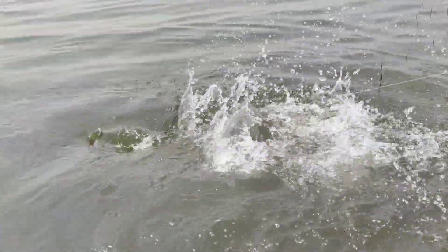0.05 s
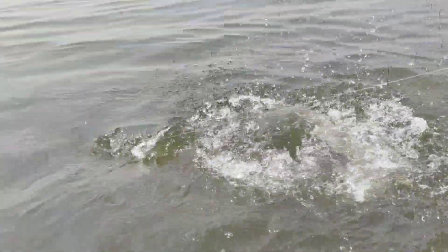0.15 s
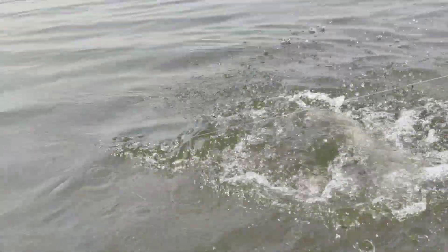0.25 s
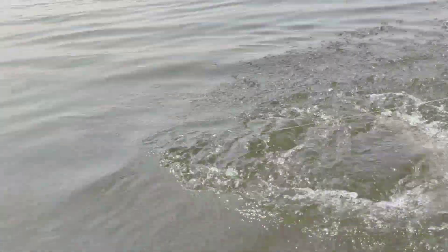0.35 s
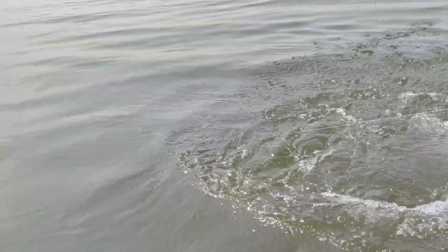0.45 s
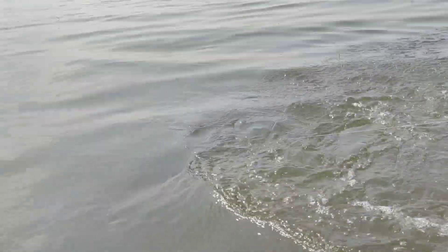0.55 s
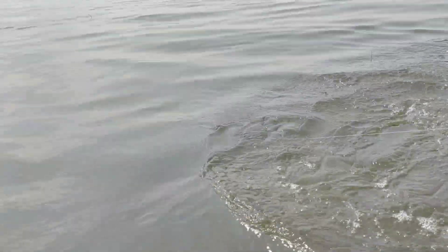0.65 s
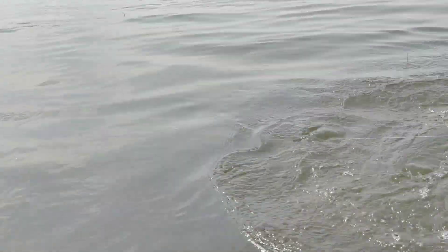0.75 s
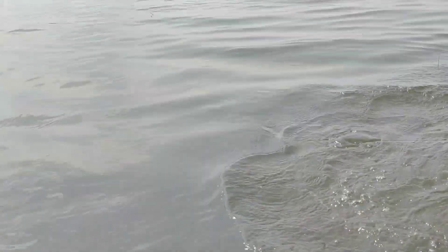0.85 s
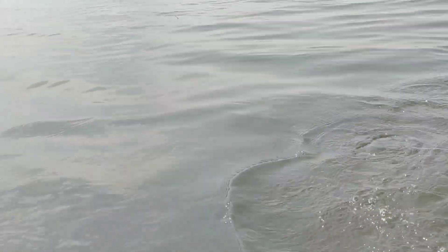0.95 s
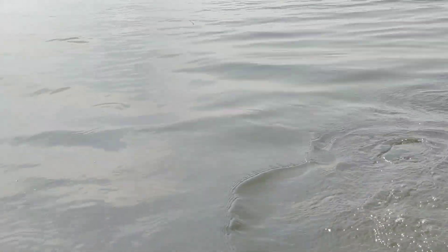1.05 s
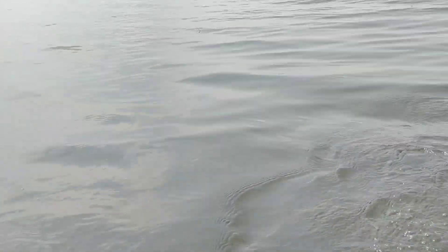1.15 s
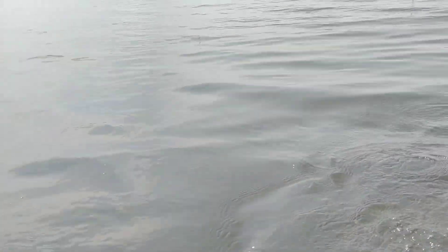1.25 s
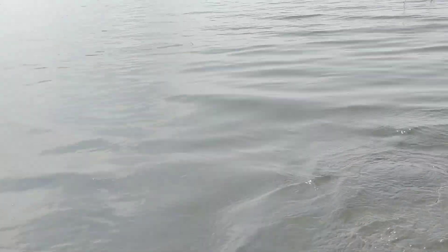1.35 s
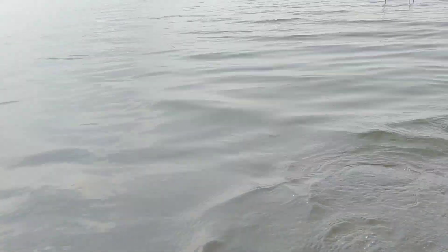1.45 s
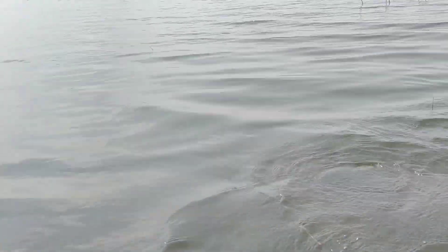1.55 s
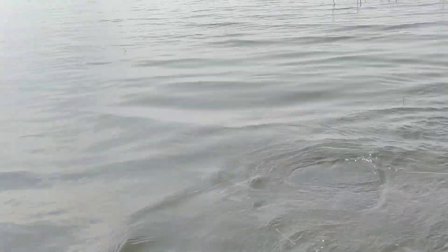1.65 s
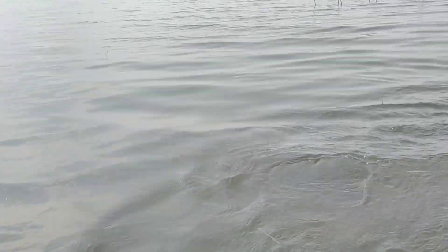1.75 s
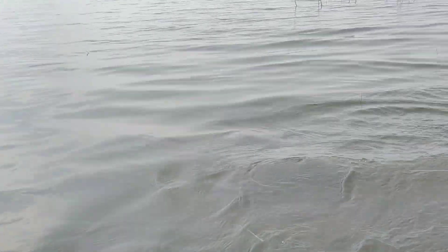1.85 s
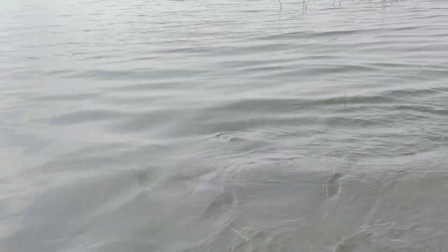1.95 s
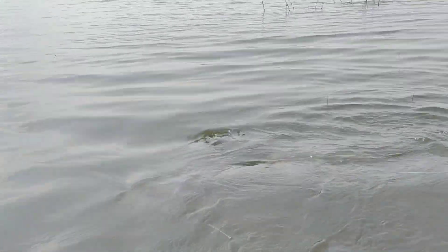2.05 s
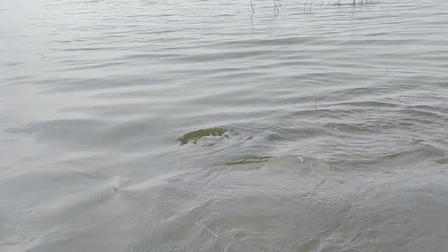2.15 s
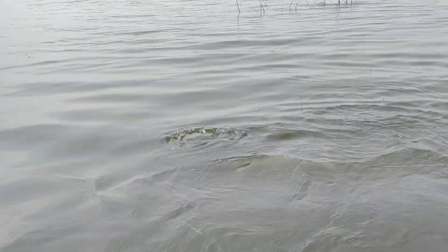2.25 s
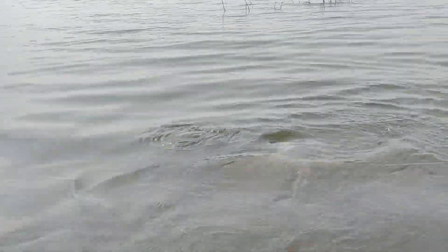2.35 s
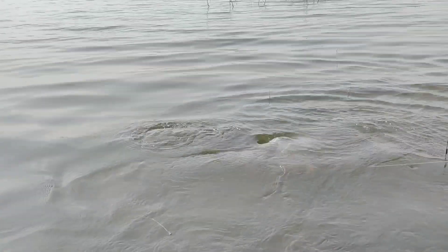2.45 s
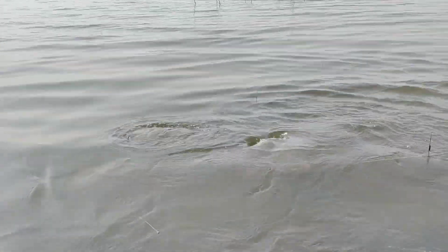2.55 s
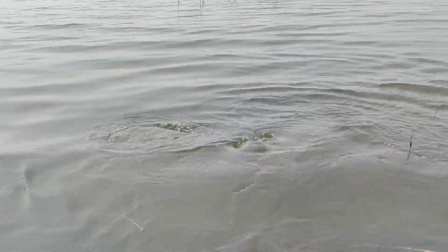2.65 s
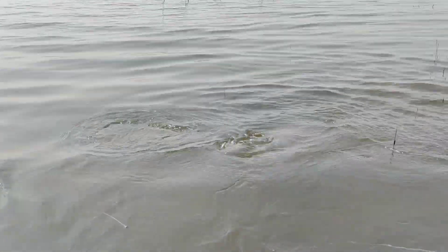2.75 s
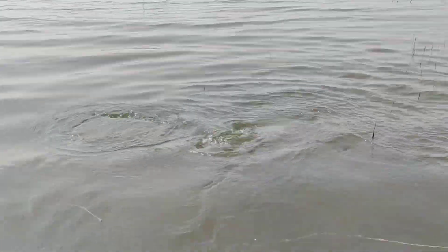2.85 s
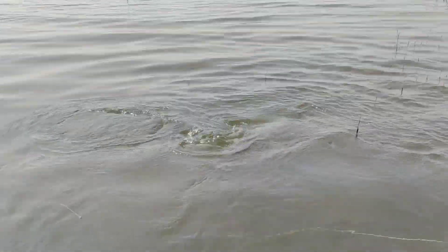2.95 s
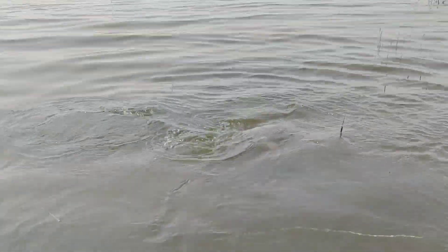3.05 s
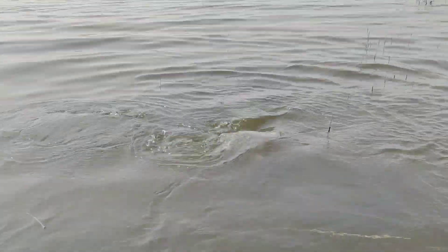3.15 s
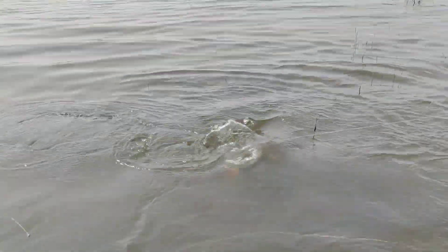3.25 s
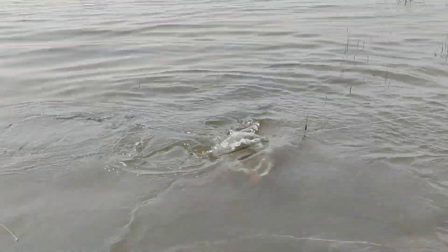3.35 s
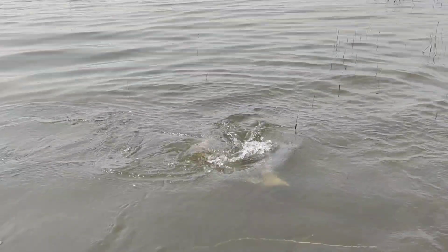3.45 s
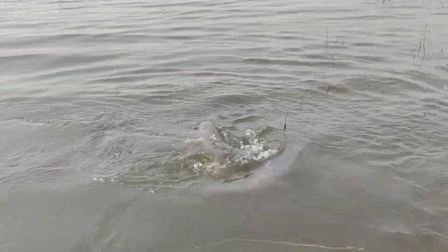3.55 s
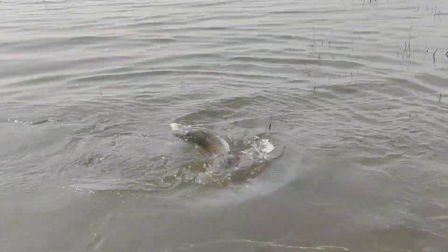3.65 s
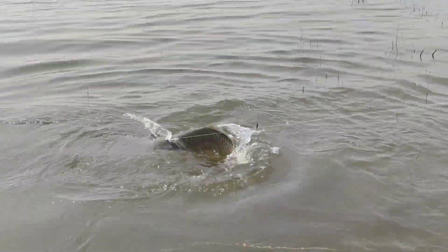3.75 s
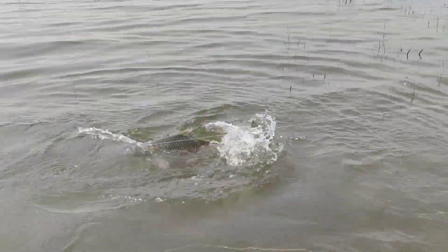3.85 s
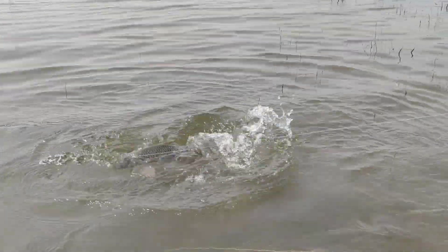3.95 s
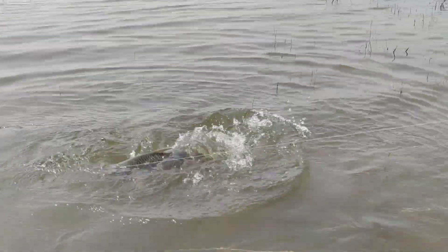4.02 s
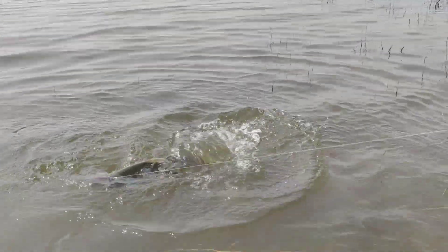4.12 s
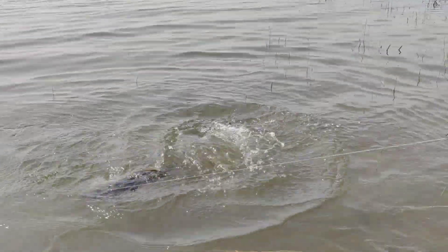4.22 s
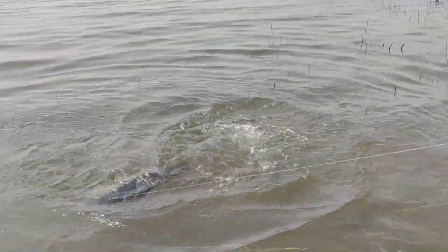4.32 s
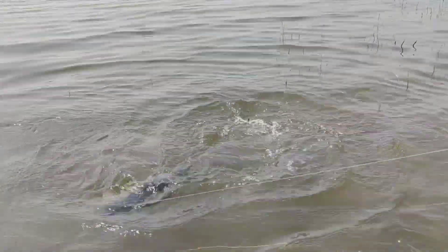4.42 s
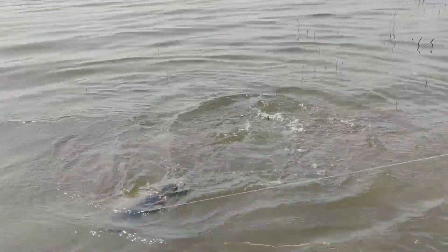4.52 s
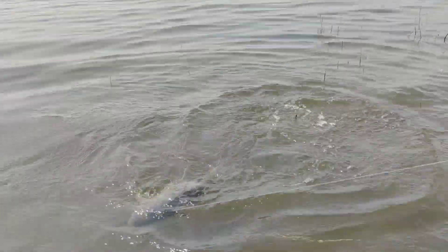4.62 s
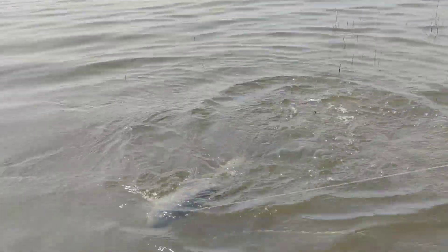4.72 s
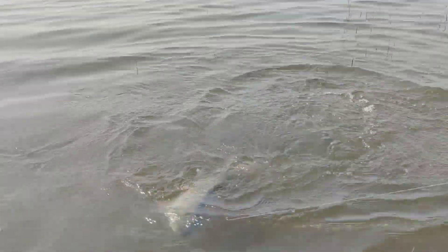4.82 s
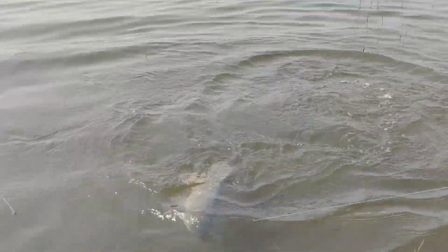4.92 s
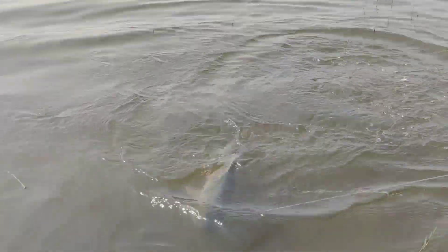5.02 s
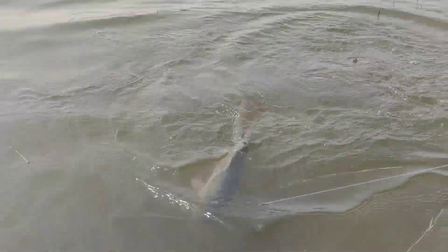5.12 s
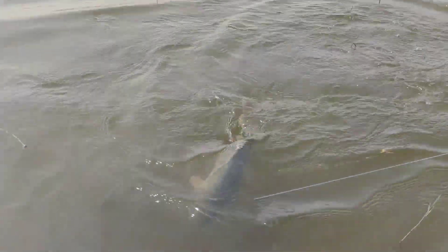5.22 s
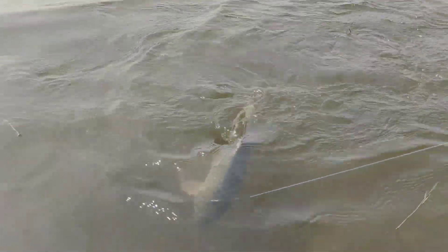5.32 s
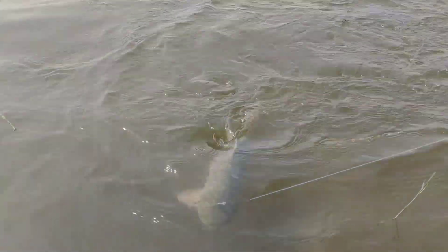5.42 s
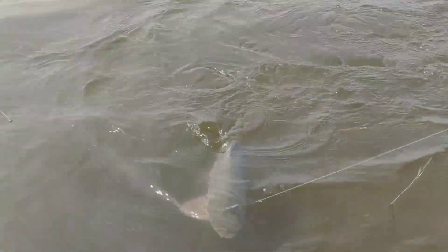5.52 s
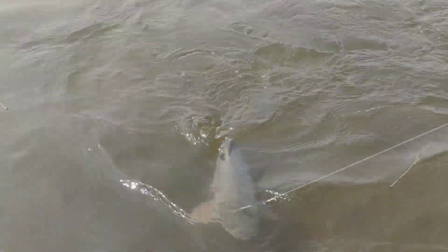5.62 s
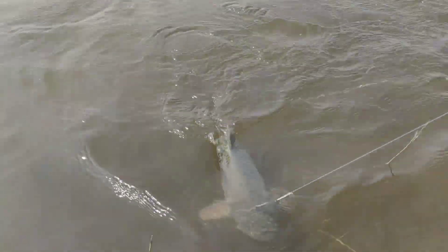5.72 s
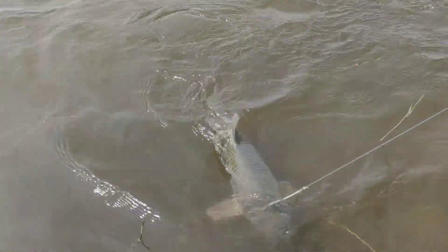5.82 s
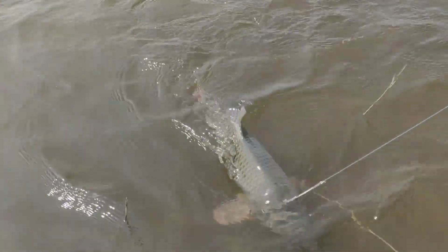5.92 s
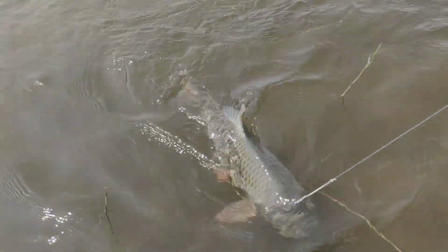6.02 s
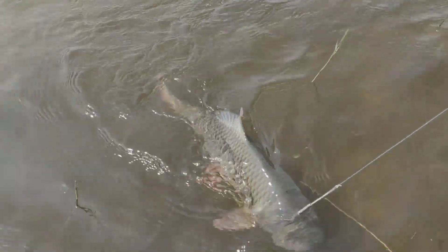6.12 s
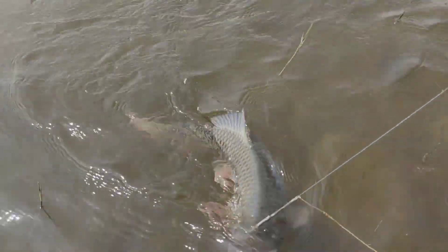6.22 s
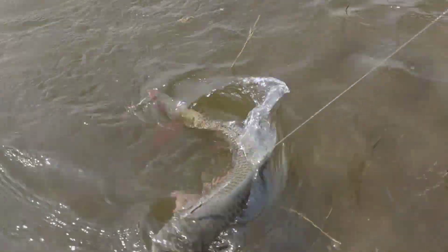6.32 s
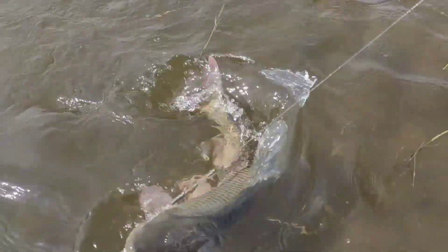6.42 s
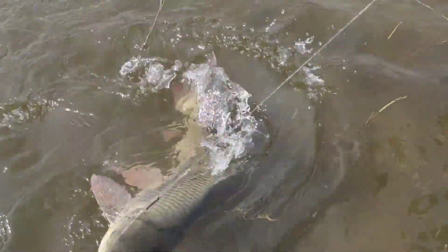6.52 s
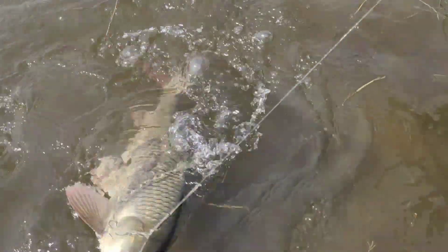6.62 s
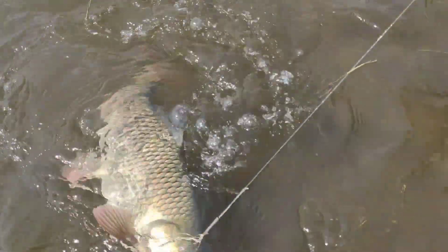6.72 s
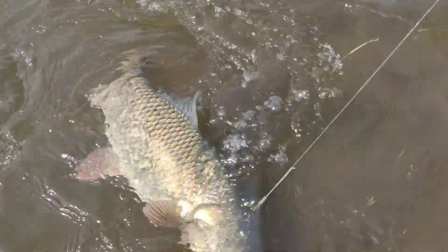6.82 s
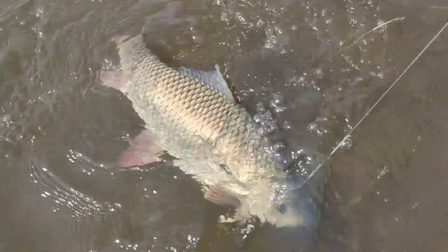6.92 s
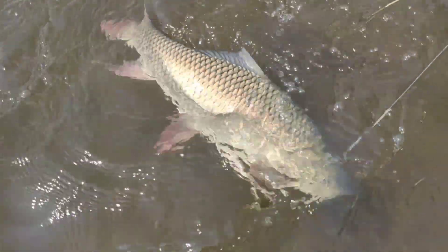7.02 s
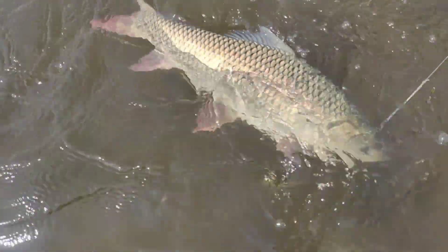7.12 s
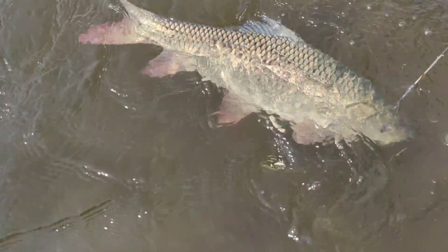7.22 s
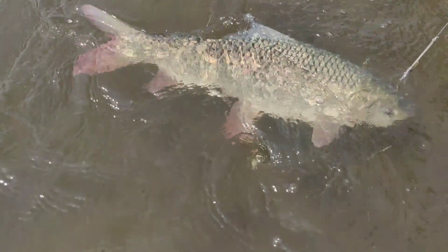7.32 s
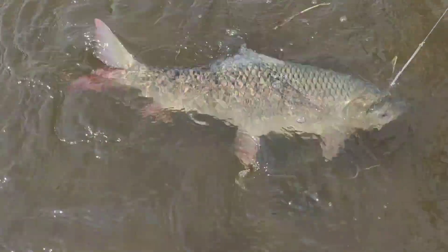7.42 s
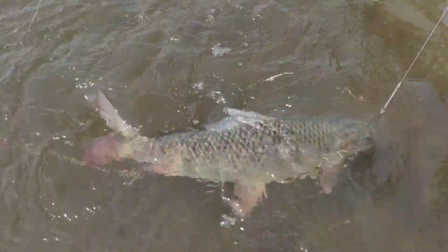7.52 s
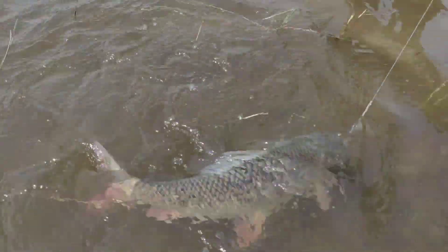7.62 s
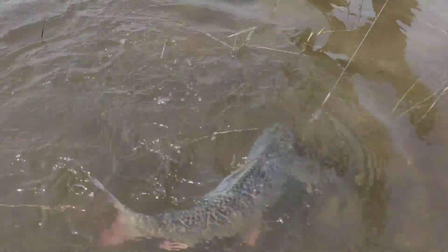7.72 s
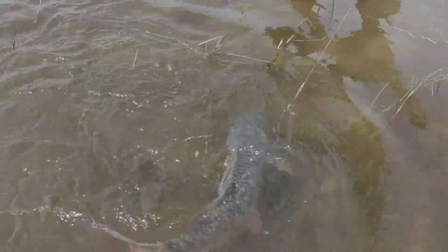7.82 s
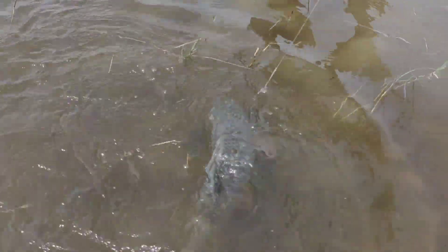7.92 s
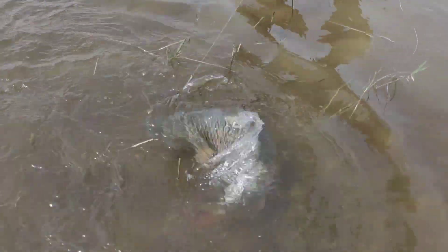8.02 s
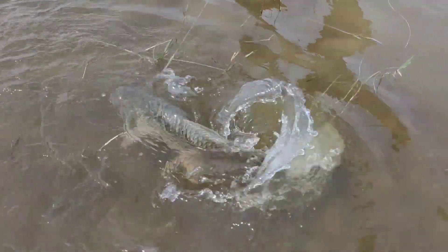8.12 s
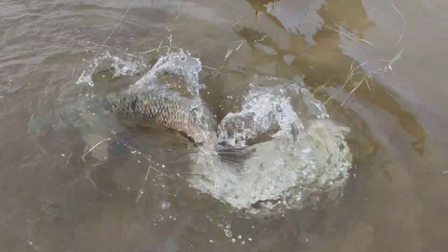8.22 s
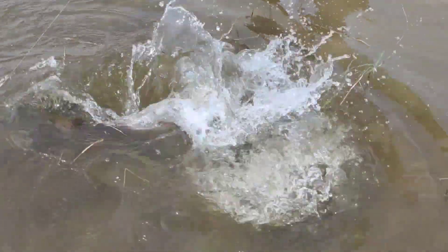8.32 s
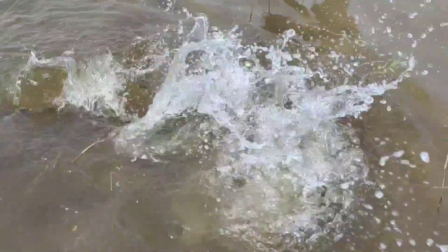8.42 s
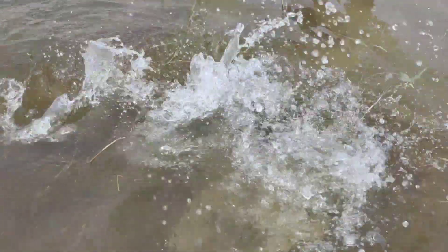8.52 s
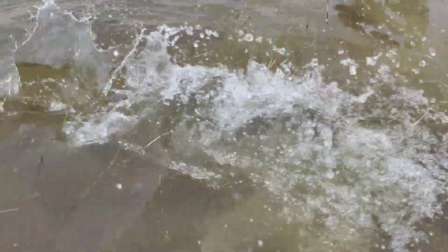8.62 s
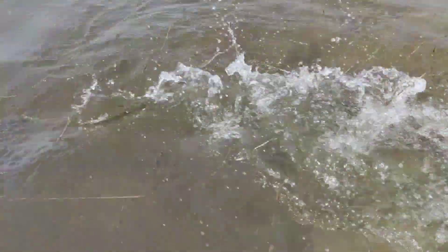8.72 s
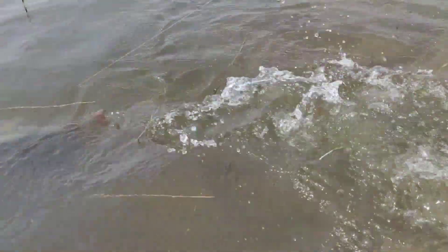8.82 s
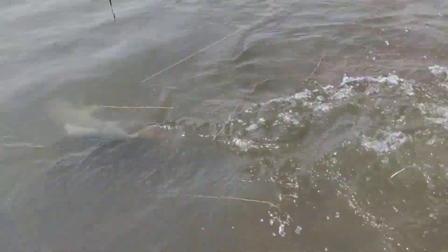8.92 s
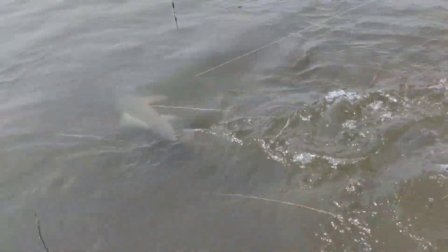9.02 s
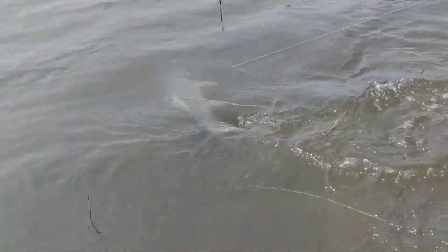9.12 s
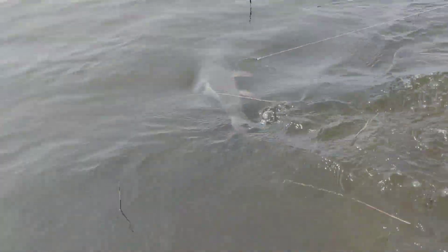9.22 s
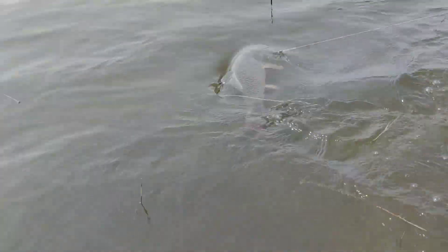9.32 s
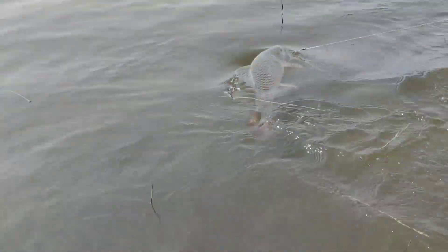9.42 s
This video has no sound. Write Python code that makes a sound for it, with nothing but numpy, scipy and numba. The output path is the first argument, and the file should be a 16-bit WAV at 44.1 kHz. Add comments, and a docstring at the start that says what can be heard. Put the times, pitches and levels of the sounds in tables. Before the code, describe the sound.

Close stereo sound of a fish fighting in shallow river water. A splash already under way settles into fizz and near quiet, with soft bumps and far bird chirps. Slaps and gulps return around three to four seconds, then sparse drips. A sharp slap follows at mid-length, another lull, then the loudest churning thrash, falling spray and last gulps. Open air, faint hiss, almost no echo.

```python
"""A hooked fish thrashes in the shallows of a river, close to two microphones.
Its body slaps the surface with short rings and cracks, trapped air gulps in sliding tones,
clouds of dying sines make the bubbles churn, and shaped noise and clicks make spray, landing drops and froth.
Around these come ringing drips, soft low bumps, noise for a light breeze and distant hiss, and a small far bird."""
import sys
import numpy as np
from scipy import signal
from scipy.fft import rfft, irfft
from scipy.io import wavfile
from scipy.ndimage import uniform_filter1d
from numba import njit

SR = 44100
rng = np.random.default_rng(int(sys.argv[2]) if len(sys.argv) > 2 else 0)


def master_out(mix):
    """Clip the mix to full scale and print it as 16-bit PCM to the path in sys.argv[1]."""
    frames = np.transpose(np.atleast_2d(mix))
    ceiling = np.clip(frames, -1, 1)
    pcm = np.round(ceiling * 32767).astype(np.int16)
    wavfile.write(sys.argv[1], SR, pcm)


N = 417186
TIME = np.arange(N) / SR

# bubble clouds, large to small, before crowding thins and evens them: (lowest pitch [Hz], highest pitch [Hz],
# bubbles tried [per s], typical cycles to ring down by 1/e [count], spread of sizes [dB])
CLOUDS = [(176.4, 610, 420, 3.4, 5.5), (495.2, 1600, 1200, 4.27, 4), (1375, 5200, 3200, 5.4, 4.5)]
# where the fish is: (time [s], lag of the left microphone [ms], scatter of the lag [ms])
PLACE = [(0, 0.054, 0.11), (2.5, 0.052, 0.01), (4.1, 0.092, 0.047), (5.3, -0.28, 0.041),
         (6.38, -0.25, 0.17), (6.47, 0.098, 0.092), (8.4, 0.13, 0.082), (8.85, 0.19, 0.12),
         (9.1, -0.4, 0.11)]
# strokes of the fish, each stirs the water, then lets it settle: (start [s], strength [dB], length [s],
# basic settling [dB per s], deep churn against the strength [dB], spray against the strength [dB])
STROKES = [(-.3, -39, 0.37, 48, -5.5, -10), (0.09, -47, 0.12, 58.5, -4, -0.5),
           (2.47, -61.5, 0.24, 49.5, -5.5, -14.5), (3.297, -55, 0.33, 50, -6.5, -14.5),
           (3.506, -51, 0.14, 66.5, -13.5, -11), (3.84, -48, 0.29, 82, -11, -8.5),
           (3.95, -47.5, 0.051, 71, -1, -3), (5.755, -69.5, 0.33, 33, -7, -2.5),
           (6.232, -67, 0.079, 50, -8, -2), (6.378, -66.5, 0.2, 48, -1, 8.5),
           (6.494, -47, 0.07, 61, -19, -1), (7.03, -69, 0.061, 16.5, -16, 0),
           (7.887, -59, 0.079, 40, -26, -4), (8.066, -49.5, 0.25, 60, -16, -9),
           (8.156, -36.5, 0.15, 66, -7.5, -5), (8.316, -29.5, 0.17, 79, -3, -10),
           (8.601, -45.5, 0.2, 69, -2, -2), (8.878, -51, 0.052, 50, -30, -5.5),
           (9.091, -47.5, 0.17, 90, -15.5, -19)]
# slaps of body and falling water: (time [s], level [dB], ring pitch [Hz], crack against the ring [dB])
SLAPS = [(.393, -34, 2100, -1), (.408, -34.5, 980, -0.5), (.45, -41, 734, 0), (.492, -40, 1114, -1),
         (2.376, -51, 900, -4), (3.238, -22.5, 1850, -20), (3.244, -39.5, 1190, -3), (3.314, -36, 706, -1),
         (3.428, -40, 600, -6), (3.678, -36.5, 1240, -8), (3.84, -33.5, 2050, -13), (3.867, -30, 1190, 1),
         (3.903, -23, 1110, -3), (3.925, -27, 370, -2), (3.96, -27.5, 314, 10), (4.009, -25.5, 1310, -1),
         (4.096, -30.5, 1100, -4), (6.571, -14, 860, -10), (6.587, -28, 970, -6), (8.102, -27.5, 1140, -16),
         (8.17, -17, 643, -25), (8.195, -17.5, 443, -18), (8.226, -18, 600, -2), (8.235, -20, 520, -10),
         (8.255, -19, 298, -5), (8.318, -16, 1800, -2), (8.378, -18.5, 304, 2), (8.39, -17.5, 298, 2),
         (8.408, -17.5, 390, -22), (8.446, -11, 893, -8), (8.463, -10.5, 390, -2), (8.548, -18, 750, -4),
         (8.692, -23, 780, -14), (8.711, -23.5, 870, 0)]
# pockets of air that gulp as they close: (time [s], level [dB], first pitch before wobble [Hz],
# last pitch before wobble [Hz], length [s], place of the crest before the closing fade [0-1])
GULPS = [(0.025, -33, 356, 276, 0.066, 0.15), (0.32, -42, 590, 1155, 0.044, .2),
         (2.495, -47, 593, 1010, 0.038, 0.28), (2.505, -51.5, 1677, 1060, 0.021, 0.5),
         (2.538, -48, 410, 545, 0.031, 0.16), (2.637, -51, 760, 970, 0.022, 0.7),
         (2.726, -50, 466, 490, 0.022, 0.33), (3.325, -38, 474, 585, 0.023, 0.35),
         (3.349, -42, 333, 375, 0.086, 0.08), (3.425, -41.5, 560, 620, 0.024, 0.19),
         (3.915, -31, 380, 312, 0.043, 0.24), (3.956, -24, 242, 170, 0.055, 0.08),
         (3.995, -17.5, 308, 430, 0.015, 0.2), (4.037, -44, 414, 374, 0.27, 0.07),
         (4.177, -50, 730, 920, 0.025, 0.1), (6.517, -27, 414, 513, 0.01, 0.12),
         (6.527, -23, 699, 1250, 0.027, 0.19), (6.588, -46, 478, 440, 0.15, .1),
         (6.73, -47.5, 448, 480, 0.047, 0.13), (6.84, -45.5, 680, 770, 0.038, .25),
         (6.883, -50.5, 782, 1080, 0.085, 0.1), (8.166, -22, 430, 217, 0.028, 1),
         (8.195, -17, 144, 95, 0.072, .08), (8.224, -15, 198, 158, 0.06, 0.11),
         (8.277, -31.5, 668, 1545, 0.033, .9), (8.368, -19.5, 263, 336, 0.045, 0.5),
         (8.43, -24, 644, 890, 0.021, 0.9), (8.459, -27, 195.5, 184, 0.16, 0.07),
         (8.676, -31, 561, 1010, 0.037, 0.6), (8.751, -23, 208, 263, 0.016, 0.08),
         (9.053, -43, 477, 980, 0.04, 0.8), (9.119, -37.5, 450, 340, 0.021, 0.11),
         (9.189, -31.5, 474, 787, 0.029, 0.21), (9.226, -43, 614, 1354, 0.022, 1),
         (9.264, -35.5, 557, 1620, 0.041, .9)]
# drips that ring one bubble each: (time [s], relative level [dB], settled pitch [Hz])
DRIPS = [(0.626, -48, 1090), (0.747, -48, 2330), (2.715, -48.5, 1240), (3.287, -43.5, 1190),
         (3.586, -40, 518), (3.64, -41, 1073), (3.911, -27.5, 1910), (4.29, -45.5, 1000),
         (4.698, -51, 1870), (5.413, -44, 896), (5.545, -47, 1530), (5.548, -53, 3570), (5.624, -51, 2900),
         (5.689, -42.5, 2500), (5.902, -50.5, 586), (5.968, -50.5, 2420), (6.247, -51.5, 853),
         (6.292, -41.5, 2530), (6.302, -45.5, 3100), (6.334, -39, 2570), (6.389, -35.5, 1350),
         (6.668, -27, 780), (6.776, -40, 1825), (6.826, -43.5, 895), (6.926, -29, 3070), (7.008, -33, 2930),
         (7.02, -37.5, 1860), (7.102, -44, 776), (7.865, -46, 1270), (7.907, -40.5, 1335),
         (7.97, -40.5, 1200), (8.969, -37, 1206), (9.259, -35, 1854), (9.367, -47, 1670)]
# thrown water landing, from dull blobs to the snap of fine drops: (time [s], relative level [dB], centre [Hz])
LANDINGS = [(0.049, -39, 4600), (0.153, -31, 4600), (0.269, -33, 2400), (2.376, -45, 2950),
            (2.575, -43, 2800), (2.568, -40, 8200), (3.457, -37, 8240), (3.542, -34.5, 2400),
            (3.607, -45, 2400), (3.479, -42.5, 8300), (3.607, -45, 8300), (3.679, -41.5, 8240),
            (3.693, -41, 8300), (3.907, -34, 4500), (4.012, -28.5, 4770), (4.06, -45, 5500),
            (5.519, -51.5, 8300), (5.901, -49.5, 8200), (6.039, -52, 8300), (6.393, -42, 8300),
            (6.4278, -39, 8300), (6.525, -30, 2570), (6.556, -32, 8300), (6.665, -41, 8300),
            (6.756, -41, 8300), (6.926, -36, 8300), (7.099, -43, 2400), (7.954, -50, 8300),
            (8.3724, -22, 8300), (8.446, -40, 2410), (8.58, -27, 8360), (8.831, -27.5, 8360),
            (8.832, -27, 2380), (8.852, -29, 2380), (8.888, -39, 8300), (9.146, -33.5, 2300),
            (9.257, -41, 2280)]
# soft low bumps, mostly on the left: (time [s], level averaged over both sides [dB], pitch [Hz])
BUMPS = [(2.325, -39.5, 109), (2.386, -37.5, 150), (2.475, -37.5, 154), (2.957, -41.5, 170),
         (4.674, -51.5, 155), (5.335, -47.5, 153), (5.685, -51, 147), (7.558, -45.5, 100),
         (7.825, -43.5, 95)]
# the bird's chirps: (time [s], relative level [dB], base pitch [Hz])
CHIRPS = [(1.854, -78, 4800), (2.342, -65, 4660), (2.845, -65, 4760), (3.055, -66, 4900), (3.24, -63, 4670),
          (4.3, -65, 4750), (4.53, -66, 4800), (4.8, -62, 4440)]
# a chirp's path: (time from its start [s], factor on the base pitch [ratio])
CHIRP_SHAPE = [(0, .94), (.03, .97), (.05, 1.01), (.06, .94), (.074, .76)]
# gusts at the microphones: (crest [s], level averaged over both sides [dB], half width to 1/e [s],
# left over right [dB])
GUSTS = [(.68, -68, 0.14, -19), (1.37, -55, 0.061, -18.5), (3.03, -65.5, 0.24, 0), (8.45, -53, 0.27, 3)]
# tone of the breeze: (frequency [Hz], level [dB])
BREEZE_COLOUR = [(20, -16.5), (45, -5.5), (80, 4.5), (160, 3), (260, -26.5), (600, -23), (2000, -52.5)]
# tone of the froth: (frequency [Hz], level [dB])
FOAM_COLOUR = [(500, -21.5), (1800, -25), (3200, 0.5), (5500, -2.5), (9000, -8), (15000, 6)]
# tone of the spray: (frequency [Hz], level [dB])
SPRAY_COLOUR = [(300, -12), (1500, 6), (4200, 1.5), (6000, -4.5), (8500, -5), (11000, -3), (13500, -2.5),
                (16000, 0)]
# tone of the distant hiss: (frequency [Hz], level [dB])
AIR_COLOUR = [(59, -17.5), (100, -7), (189, -3), (580, -12.5), (717, -14), (797, -14.5), (1540, -17.5),
              (3590, -20), (4250, -22), (5480, -21), (7060, -25), (8920, -22.5), (14800, -27.5),
              (15800, -31)]
# how alike the hiss is on both sides: (frequency [Hz], left-right coherence [0-1])
AIR_LIKENESS = [(50, 0.5), (200, 0.66), (500, 0.29), (1000, 0.11), (4000, 0.034)]
# how the left microphone colours the water: (frequency [Hz], gain [dB])
LEFT_PORT = [(100, -14.5), (400, 2.5), (680, 0), (1100, 5.5), (2600, 7), (4500, 1), (7200, -5), (8900, 5),
             (11000, 3), (15000, -9)]
# how the right microphone colours the water: (frequency [Hz], gain [dB])
RIGHT_PORT = [(100, -6.5), (400, 0), (580, -1), (950, 4), (2600, 2.7), (4500, 1.5), (6500, 4), (7600, 7),
              (8600, 13.5), (9800, 6.5), (12000, -5), (15000, -8)]

STROKE_RISE_S = 0.024  # time a stroke takes to build up
DEEP_LAG_S = 0.015  # large bubbles form only once the hollow behind the stroke closes
EVENING = 0.25  # share by which a crowd of bubbles or drops evens out their sizes
FOAM_FULL_DB = -32.5  # strength beyond this adds no more froth
# froth left by one second of stirring against its strength, time to form, fading
FOAM_DB, FOAM_RISE_S, FOAM_FADE_DB_PER_S = 1, 0.13, 10
BREEZE_DB = -69.5  # steady breeze beneath the gusts, before its lumps


def gain_of(db):
    """Turns decibels into a gain."""
    return 10 ** (np.asarray(db) / 20)


def evened(x):
    """Scales to an average strength (rms) of 1."""
    return x / np.sqrt(np.mean(x ** 2) + 1e-20)


def steadied(x, size):
    """Holds the rms near 1 over size samples and keeps the finer grain."""
    power = (x ** 2).mean(0)
    power = uniform_filter1d(uniform_filter1d(power, size), size)
    return x / np.sqrt(abs(power) + power.mean() / 100)


def slow_noise(size):
    """Random ups and downs, smoothed twice over size samples, with an rms of 1."""
    noise = rng.standard_normal(N)
    return evened(uniform_filter1d(uniform_filter1d(noise, size), size))


def read(points, hz):
    """Reads a frequency table on a log-frequency axis."""
    f, value = np.transpose(points)
    return np.interp(np.log(hz + 1), np.log(f + 1), value)


def along(rows, s, axis=1):
    """Reads one column of a table at times s."""
    rows = np.array(rows)
    return np.interp(s, rows[:, 0], rows[:, axis])


def coloured(x, points):
    """Filters with the given spectrum, without sounding ahead of the input."""
    log_gain = np.log(gain_of(read(points, abs(np.fft.fftfreq(4096, 1 / SR)))))
    # minimum phase puts the filter's energy as early as it can be
    taps = np.fft.ifft(np.exp(np.conj(signal.hilbert(log_gain)))).real[:2048]
    return signal.oaconvolve(x, taps[None], axes=1)[:, :N]


def add(mix, s, sound):
    """Places a sound at the fish, reaching the two microphones a little apart."""
    lag_s = along(PLACE, s) / 1000
    for port, at in zip(mix, (s + lag_s / 2, s - lag_s / 2)):
        part = port[max(round(at * SR), 0):][:len(sound)]
        part += sound[:len(part)]


def sides(left_db):
    """Gains of the two microphones for a sound that is stronger at one of them."""
    return 2 / (1 + gain_of([[-left_db], [left_db]]))


def burst(low_hz, high_hz, rise_s, fade_s, grain_db=0):
    """A puff of breaking water with a peak of 1: filtered noise; the grainier, the more it crackles."""
    t = np.arange(4000) / SR
    noise, grain = rng.standard_normal((2, len(t)))
    swell = (1 - np.exp(-t / rise_s)) ** 2 * np.exp(-t / fade_s) * gain_of(grain_db * grain)
    band = signal.butter(2, [low_hz, min(high_hz, SR / 2.5)], "band", fs=SR)
    puff = signal.lfilter(*band, noise * swell)
    return puff / abs(puff).max()


def stirred(depth=0, spray=0, settling=1, lag_s=0):
    """Strength of one water layer: strokes build up, hold and settle, weighted by their depth and spray."""
    power = np.zeros(N)
    for s, db, length, db_per_s, depth_db, spray_db in STROKES:
        first = max(int(s * SR), 0)
        t = TIME[first:first + 2 * SR] - s
        settled_db = settling * db_per_s * np.maximum(t - length, 0)
        level_db = db + depth * depth_db + spray * spray_db - settled_db
        build_up = np.clip((t - lag_s) / STROKE_RISE_S, 0, 1)
        power[first:first + len(t)] += (build_up * gain_of(level_db)) ** 2
    return np.sqrt(power) + 1e-9


def crowding(stir, growth=0.62, full_db=-5):
    """Share of the most drops or bubbles the water can hold: full just under the hardest thrash."""
    return np.minimum(stir / (gain_of(full_db) * stir.max()), 1) ** growth


def clumps(depth_db, size):
    """Water falls in uneven sheets: a gain that surges within hundredths of a second."""
    surge = np.tanh(slow_noise(size) / 2) * 2  # holds back the extremes
    return evened(gain_of(depth_db * surge))


@njit
def ring_all(starts, hz, size, life, glide, out_length, sr):
    """Sums dying sines whose pitch glides, one for each bubble and microphone."""
    out = np.zeros((2, out_length))
    for port in range(2):
        for k in range(len(hz)):
            first = int(starts[port, k] * sr) + 1
            for i in range(max(first, 0), min(first + int(6 * life[k] * sr), out_length)):
                t = i / sr - starts[port, k]
                u = t / life[k]
                swell = np.exp(-u) - np.exp(-3 * hz[k] * t)
                out[port, i] += size[k] * swell * np.sin(2 * np.pi * hz[k] * t * (1 + glide[k] * u))
    return out


def cloud(low_hz, high_hz, per_s, cycles, spread_db, stir, rise=0.015, calm=0.03):
    """Bubbles ring all round the fish, crowding into an even roar when it thrashes; many rise in pitch."""
    crowd = crowding(stir)
    draws = rng.random((int(per_s * N / SR), 8))
    born = draws[:, 7] < calm + crowd[(draws[:, 0] * N).astype(int)]
    when, pitch, big, damp, a, b, c, _ = draws[born].T
    s = when * N / SR
    hz = low_hz * (high_hz / low_hz) ** pitch
    scatter = np.sqrt(6) * (a - b)  # standard deviation 1
    lag_s = (along(PLACE, s) + along(PLACE, s, axis=2) * scatter) / 1000
    evening = EVENING * np.minimum(2 * np.interp(s, TIME, crowd), 1)
    size_db = spread_db * (1 - evening) * np.minimum(-np.log(big), 4.5)
    life = np.maximum(cycles * 7.7 ** (2 * damp - 1), 0.6) / hz
    # bubbles near the ends of the range are softer, and long rings start softer
    size = gain_of(size_db) * np.sin(np.pi * pitch) ** 0.6 / (life * hz) ** 0.4
    starts = np.array([s + lag_s / 2, s - lag_s / 2])
    rings = ring_all(starts, hz, size, life, rise * (2.4 * c - 0.7), N, SR)
    return stir * steadied(rings, size=1900)


def churn(deep_db=3.5, middle_db=-1.06, small_db=0.5):
    """Three clouds: large bubbles come with deep strokes and settle first, small ones go with the spray."""
    deep = stirred(depth=1, settling=1.12, lag_s=DEEP_LAG_S)
    stirs = deep, stirred(), stirred(spray=0.5)
    levels_db = deep_db, middle_db, small_db
    return sum(gain_of(db) * cloud(*bubbles, stir) for db, bubbles, stir in zip(levels_db, CLOUDS, stirs))


def spray(per_s=4200, spray_db=3, drop_spread_db=6.0, mist=0.2):
    """Droplets hit the surface in clumps of tiny clicks, sparse in a small splash, over a fine mist."""
    stir = stirred(spray=0.78)
    crowd = crowding(stir)
    falls = rng.random(N) < per_s / SR * crowd
    size_db = drop_spread_db * (0.5 - 2 * EVENING * crowd) * np.minimum(rng.exponential(1, N), 4.5)
    right = gain_of(size_db) * falls * rng.choice([-1, 1], N)
    lag_s = (along(PLACE, TIME) + along(PLACE, TIME, axis=2) * rng.standard_normal(N)) / 1000
    arrival = np.clip(np.round((TIME + lag_s) * SR).astype(int), 0, N - 1)
    left = np.bincount(arrival, right, N)
    drops = steadied(np.array([left, right]), size=4000) + mist * rng.standard_normal((2, N))
    drops = drops * clumps(depth_db=6 - 2.5 * crowd, size=150)
    return gain_of(spray_db) * stir * steadied(coloured(drops, SPRAY_COLOUR), size=4400)


def foam():
    """Countless tiny bubbles burst in the froth as grainy noise; long, hard strokes leave the most."""
    power = np.zeros(N)
    for s, db, length, *_ in STROKES:
        t = np.maximum(TIME - s, 0)
        level_db = min(db, FOAM_FULL_DB) + FOAM_DB - FOAM_FADE_DB_PER_S * t
        power += (length * np.minimum(t / FOAM_RISE_S, 1) * gain_of(level_db)) ** 2
    fizz = rng.standard_normal((2, N)) * gain_of(0.93 * rng.standard_normal((2, N)))
    return np.sqrt(power) * evened(coloured(fizz, FOAM_COLOUR))


def bank(x, level_db=-19, t60=0.07, lowest_hz=450):
    """Weak short scatter from the bank and the ripples, which turn back only the shorter waves."""
    t = np.arange(SR // 3) / SR
    sparse = (rng.random((2, len(t))) < 0.06) * (t > 0.003)
    taps = rng.standard_normal((2, len(t))) * sparse * gain_of(-60 * t / t60)
    taps = signal.lfilter(*signal.butter(2, lowest_hz, "high", fs=SR), taps)
    return gain_of(level_db) * signal.oaconvolve(x, taps / np.linalg.norm(taps[0]), axes=1)[:, :N]


def breeze():
    """Strength of the wind at each microphone: a light steady flow, and gusts that swell and drop."""
    strength = gain_of(BREEZE_DB)
    for s, db, width, left_db in GUSTS:
        strength = strength + sides(left_db) * gain_of(db) * np.exp(-((TIME - s) / width) ** 2)
    return strength


def outdoors(air_db=-63.6, lumps_db=3.5):
    """Even distant hiss, partly shared by both sides, and a lumpy breeze: both are coloured noise."""
    z, hz = rfft(rng.standard_normal((2, 2, N))), np.fft.rfftfreq(N, 1 / SR)
    same = np.clip(read(AIR_LIKENESS, hz), -1, 1)
    z[:, 1] = same * z[:, 0] + np.sqrt(1 - same ** 2) * z[:, 1]
    air = evened(irfft(z[0] * gain_of(read(AIR_COLOUR, hz)), N))
    wind = evened(irfft(z[1] * gain_of(read(BREEZE_COLOUR, hz)), N))
    lumps = gain_of(lumps_db * slow_noise(2500))
    return gain_of(air_db) * air + breeze() * lumps * wind


def gulps(wobble=0.056):
    """A pocket of air swells, wobbles and slides in pitch as its shape changes."""
    out = np.zeros((2, N))
    for s, db, first_hz, last_hz, length, crest in GULPS:
        u = np.linspace(0, 1, int(length * SR))
        waver = evened(uniform_filter1d(rng.standard_normal(SR), 180))[:len(u)]
        hz = first_hz * (last_hz / first_hz) ** (u ** 1.43) * (1 + wobble * waver)
        swell = (u / crest * np.exp(1 - u / crest)) ** 0.49 * np.minimum(6 * (1 - u), 1)
        add(out, s, gain_of(db) * swell * np.sin(2 * np.pi * np.cumsum(hz) / SR))
    return out


def landings(level_db=0.5, spread=1.5, rise_s=0.0004, fade_cycles=17.0, grain_db=5):
    """Blobs and drops land on the surface: the smaller, the brighter and shorter."""
    out = np.zeros((2, N))
    for s, db, hz in LANDINGS:
        puff = burst(hz / spread, hz * spread, rise_s, fade_cycles / hz, grain_db)
        add(out, s, gain_of(db + level_db) * puff)
    return out


def slaps(cycles=7.4, crack_s=0.0089):
    """A flat blow squeezes air into a ring of a few cycles, with a crack of breaking water."""
    out, t = np.zeros((2, N)), np.arange(4000) / SR
    for s, db, hz, crack_db in SLAPS:
        fade = gain_of(-60 * hz * t / cycles)  # down 60 dB after this many cycles
        ring = np.sin(2 * np.pi * hz * t) * fade * (1 - np.exp(-hz * t)) ** 2
        crack = burst(0.24 * hz, 1.48 * hz + 600, rise_s=0.00077, fade_s=crack_s)
        blow = ring / abs(ring).max() + gain_of(crack_db) * crack
        add(out, s, gain_of(db) * blow / abs(blow).max())
    return out


def drips(level_db=-1, pinch=0.19, pinch_s=0.0013, after=0.93, cycles=75):
    """A bubble pinches off with a sharp plink, settles in pitch and rings on softly."""
    out, t = np.zeros((2, N)), np.arange(9000) / SR
    for s, db, hz in DRIPS:
        turns = np.cumsum(hz * (1 + pinch * np.exp(-t / pinch_s))) / SR
        ring_on = after * gain_of(-60 * hz * t / cycles)  # down 60 dB after this many cycles
        fade = (np.exp(-t / pinch_s) + ring_on) * (1 - np.exp(-2 * hz * t))
        add(out, s, gain_of(db + level_db) * fade / fade.max() * np.sin(2 * np.pi * turns))
    return out


def bird(level_db=-1):
    """Thin far chirps: sines that arch up in pitch and drop away."""
    out, t = np.zeros((2, N)), np.arange(0, CHIRP_SHAPE[-1][0], 1 / SR)
    swell = np.sin(np.pi * np.linspace(0, 1, len(t)) ** 1.7)
    for s, db, hz in CHIRPS:
        note = np.sin(2 * np.pi * np.cumsum(hz * along(CHIRP_SHAPE, t)) / SR) * swell
        out[:, round(s * SR):][:, :len(t)] += gain_of(db + level_db) * note
    return out


def bumps(cycles=2.26, left_db=34, rustle=0.54, rustle_hz=800):
    """Dull pushes of a cycle or two at the microphones, each with a little rustle of noise."""
    out, t = np.zeros((2, N)), np.arange(4000) / SR
    for s, db, hz in BUMPS:
        fade = gain_of(-60 * hz * t / cycles)  # down 60 dB after this many cycles
        push = np.sin(2 * np.pi * hz * t) * fade * (1 - np.exp(-2 * hz * t))
        thud = push / abs(push).max() + rustle * burst(147, rustle_hz, rise_s=0.00078, fade_s=0.0081)
        out[:, round(s * SR):][:, :len(t)] += sides(left_db) * gain_of(db) * thud
    return out


def scene():
    """The near water, coloured by each microphone, in the open air."""
    thrash = (churn() + spray()) * clumps(depth_db=0.13, size=400)
    water = thrash + foam() + gulps() + landings() + slaps() + drips()
    water = water + bank(water)
    near = np.vstack([coloured(water[:1], LEFT_PORT), coloured(water[1:], RIGHT_PORT)])
    return near + outdoors() + bird() + bumps()


def record(dry, low_cut_hz=58, edge_hz=15800):
    """Cuts the lowest rumble and everything above the upper edge."""
    thin = signal.lfilter(*signal.butter(3, low_cut_hz, "high", fs=SR), dry)
    return signal.oaconvolve(thin, signal.firwin(511, edge_hz, window=("kaiser", 9), fs=SR)[None], "same")


dry = scene()
out = record(dry)
master_out(out)
```